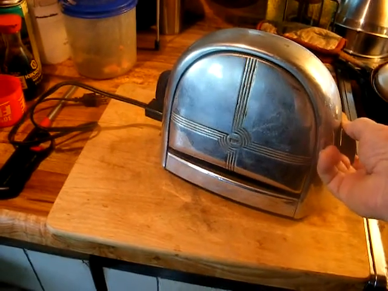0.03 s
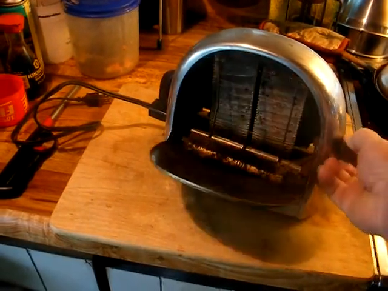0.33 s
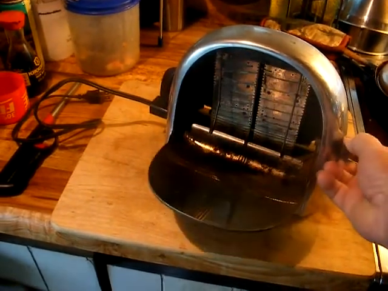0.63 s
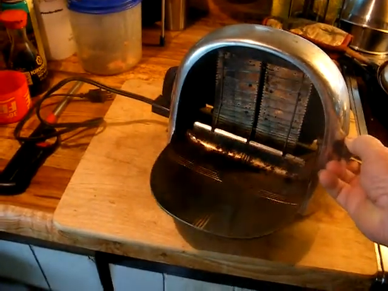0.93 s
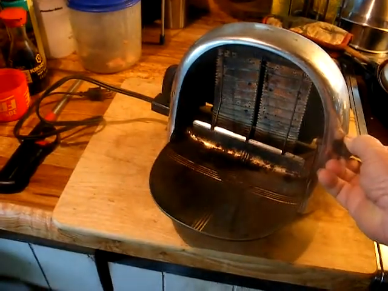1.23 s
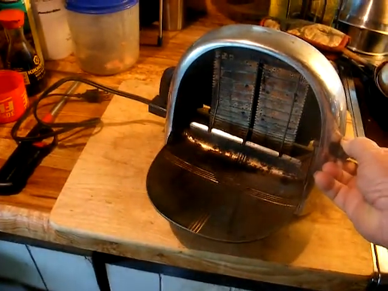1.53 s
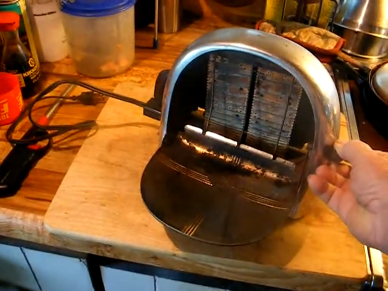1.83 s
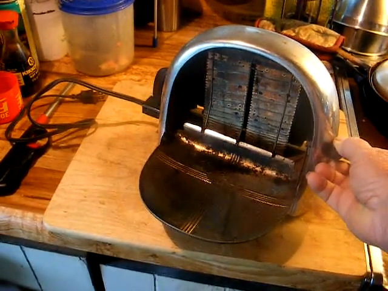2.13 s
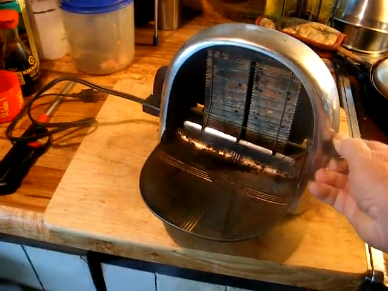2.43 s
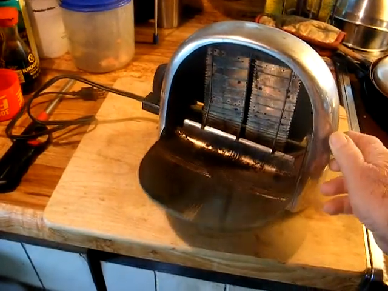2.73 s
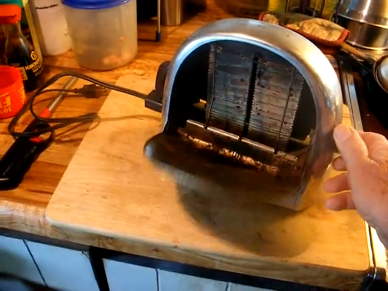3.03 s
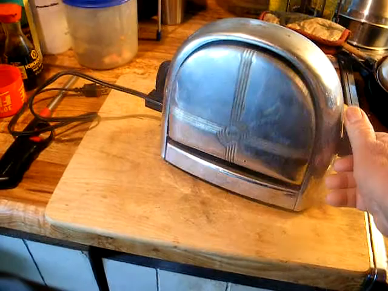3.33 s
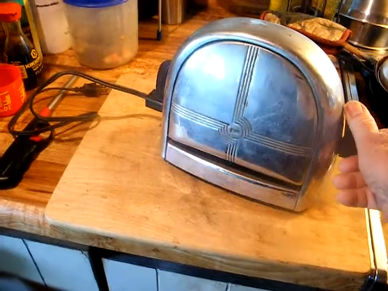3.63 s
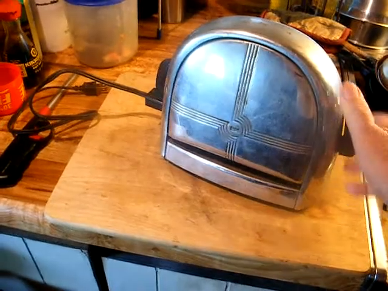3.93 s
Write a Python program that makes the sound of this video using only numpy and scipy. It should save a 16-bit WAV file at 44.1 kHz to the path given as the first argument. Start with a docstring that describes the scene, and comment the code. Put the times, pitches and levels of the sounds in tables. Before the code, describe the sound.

An old toaster's metal door drops open with a clank and bounces, then swings shut with a rattling clunk as the base knocks on a wooden board. A fan and low hum drone in a small kitchen, through a dull microphone.

```python
"""A fan and mains hum drone in a small kitchen. Over them the sheet-metal door of an old toaster is lowered
by its side knob, bounces open, and is later swung shut with a clunk and one dry electrical tick.
Each contact thumps the case, clanks the door panel and rings the linkage and its spring, while the base
rocks on its wooden board with hollow knocks. The microphone is dull and close to overload."""
import sys
import numpy as np
from scipy import signal
from scipy.fft import irfft
from scipy.io import wavfile
from scipy.ndimage import uniform_filter1d

SR = 44100
rng = np.random.default_rng(int(sys.argv[2]) if len(sys.argv) > 2 else 0)


def dump_mix(stems):
    """Bounce the given channels to the path in sys.argv[1] as a 16-bit WAV at rate SR."""
    frames = np.atleast_2d(stems).T  # one column per channel
    limited = np.clip(frames, -1, 1)  # hard clip at full scale
    pcm = np.round(limited * 32767).astype(np.int16)
    wavfile.write(sys.argv[1], SR, pcm)


N = 176400

# colour of the fan's air noise (frequency [Hz], relative level [dB])
FAN_SPECTRUM = [(30, -87.5), (85, -71), (135, -58), (185, -61), (215, -51), (250, -55), (290, -47),
                (350, -45), (430, -50), (480, -53), (640, -58), (780, -60), (920, -57.5), (1120, -63.5),
                (1400, -69.5), (1850, -69.5), (2150, -65.5), (2600, -69.5), (3100, -74), (3650, -78),
                (3850, -87), (4200, -88.5), (4400, -91.5), (4900, -99)]
# duct resonances on top of the air (centre [Hz], width [Hz], lift [dB])
DUCT_PEAKS = [(332, 35.2, 6.76), (412, 27, 3.3), (694, 18, 3.8), (834, 41, 7.7), (1081, 30, 4),
              (1716, 70, 3.4)]
# mains and motor hum (frequency [Hz], rms level [dB], waver [share of amplitude])
HUM_PARTIALS = [(57, -46, 0.092), (115.9, -39, .3), (173.3, -48.5, .4)]

# the base rocking on the board (time [s], pitch [Hz], level [dB], attack [s], t60 [s])
BASE_KNOCKS = [(0.3385, 690.3, -12, 0.0034, .085), (3.5420, 659, -2.5, 0.0054, .105),
               (3.6255, 533, -11, 0.003, 0.092), (3.8500, 548, -17.5, 0.0059, .09),
               (3.8800, 548, -17.5, 0.0082, 0.053), (3.9740, 550, -17.5, 0.0041, .17)]
# woody grain around each knock (frequency [multiple of the pitch], relative level [dB])
GRAIN_SPECTRUM = [(.3, -32), (.65, -7.5), (1, 1.5), (1.45, -9.5), (2.5, -37)]

# ringing modes of each part, dull to bright (frequency [Hz], relative level [dB], unscaled t60 [s])
CASE_MODES = [(364.7, -4.5, 0.093), (429, -13.5, .09), (539.4, -8.5, 0.044)]
PANEL_MODES = [(670, -1.5, 0.13), (786.6, -3, .09), (842, -9, 0.094), (1034, -8, 0.11), (1113, -5, 0.13),
               (1420, -11.5, .08), (1557, -16, .09), (1760, -15.5, 0.074)]
LINKAGE_MODES = [(2095, 0.5, 0.075), (2280, -8.5, 0.11), (2781, -1.5, .11), (2840, -6, 0.11),
                 (2945, -2, 0.057), (3030, -1.5, 0.062), (3370, -6.5, 0.11), (3554, -5.5, .08),
                 (3570, -10, .08), (4340, -19.5, 0.14)]
SPRING_MODES = [(2280, -8.5, .07), (2395, 1.5, 0.063), (2388, -4, 0.1)]
# colour of the dense clatter around those modes (frequency [Hz], relative level [dB])
CASE_SPECTRUM = [(100, -20), (250, -11.5), (370, 0.5), (550, -5.5), (800, -30), (1500, -45)]
PANEL_SPECTRUM = [(250, -22.5), (500, -13.5), (700, 1), (1100, -4), (1400, -11), (1900, -11), (2800, -32),
                  (5000, -60)]
LINKAGE_SPECTRUM = [(900, -19.5), (1700, -1), (2200, 1), (3000, 0), (3600, -1.5), (3900, -10.5),
                    (4500, -15.5), (5200, -30.5)]
SPRING_SPECTRUM = [(1700, -25), (2100, -13.5), (2370, 3), (2520, -8), (3200, -32)]
# door hits, opening and then shutting
# (time [s], case [dB], panel [dB], linkage [dB], spring [dB], attack [s], decay scale [factor])
DOOR_HITS = [(0.3258, -22, -14.5, -16, -33.5, .001, 1.2), (0.3395, -11, -18.5, -25.5, -29.5, .002, .8),
             (0.3850, -43, -28.5, -27, -25, .004, 1.1), (0.4105, -40, -33, -24, -20, .003, 0.84),
             (0.4210, -29, -23.5, -19.5, -12.5, 0.0018, 0.8),
             (0.4360, -29.5, -20.5, -17.5, -32.5, .003, 0.58), (0.4500, -19.5, -21, -30, -32, .002, 2),
             (0.6323, -17, -16, -22, -26.5, .002, 1.1), (0.7000, -24.5, -18, -22, -33.5, 0.0021, 0.94),
             (3.3394, -34, -16.5, -13.5, -8.5, 0.0032, .85), (3.3570, -25, -36.5, -28, -28, 0.003, 0.58),
             (3.4310, -40, -27.5, -34, -37, .004, 1.5), (3.4880, -32, -33, -35, -31.5, .005, 2.1),
             (3.5340, -35, -19.5, -27.5, -25, 0.0029, 1.0), (3.5480, -14.5, -12, -20.5, -28.5, 0.0011, 1.4),
             (3.5635, -19.5, -18, -20.5, -21, 0.0016, 0.97), (3.6010, -15, -17.5, -18, -24, .001, 1.12),
             (3.6120, -33, -27, -23, -25.5, .002, 1.2), (3.6280, -18, -23.5, -29, -30, 0.004, 1.3),
             (3.7722, -45, -42, -20.5, -30.5, 0.0052, 0.88), (3.8800, -31, -29, -34, -38, 0.0063, 1.8)]


def amp(db):
    """Decibels to gain."""
    return 10 ** (np.asarray(db) / 20)


def unit(x):
    """Scale to rms 1."""
    return x / np.sqrt(np.mean(x ** 2))


def noise(spectrum, size, peaks=()):
    """Coloured noise of rms 1, with resonant peaks on top."""
    freqs = np.arange(size // 2 + 1) * SR / size + 1e-3
    hz, db = np.array(spectrum).T
    shape_db = np.interp(np.log(freqs), np.log(hz), db)
    for centre, width, lift in peaks:
        shape_db += lift / (1 + (2 * (freqs - centre) / width) ** 2)
    phases = np.exp(2j * np.pi * rng.random(len(freqs)))
    return unit(irfft(amp(shape_db) * phases, size))


def wander(rate_hz):
    """Smooth random modulation of rms 1."""
    step = int(SR / rate_hz)
    stairs = np.repeat(rng.standard_normal(N // step + 1), step)
    return unit(uniform_filter1d(uniform_filter1d(stairs, step), step)[:N])


def fade(t, t60):
    """Exponential decay, 60 dB down after t60 seconds."""
    return np.exp(-np.log(1000) * t / t60)


def strike(t, attack, t60, hold=0):
    """Percussive envelope: linear attack, hold, free decay."""
    return np.minimum(t / attack, 1) * fade(np.maximum(t - attack - hold, 0), t60)


def add(out, start, x):
    """Mix a sound in at a time in seconds."""
    i = int(start * SR)
    out[i:i + len(x)] += x[:max(N - i, 0)]


def fan(level_db=-20.5, flutter_db=0.4):
    """A bed of air droning in duct resonances, with a slight flutter in level."""
    air = noise(FAN_SPECTRUM, N, peaks=DUCT_PEAKS)
    return air * amp(level_db + flutter_db * wander(rate_hz=14))


def hum():
    """Low mains and motor tones, each wavering in level and phase."""
    out, t = np.zeros(N), np.arange(N) / SR
    for hz, db, depth in HUM_PARTIALS:
        waver = 1 + depth * (wander(rate_hz=12) + 1j * wander(rate_hz=12))
        out += amp(db) * np.sqrt(2) * np.real(waver * np.exp(2j * np.pi * hz * t))
    return out


def kitchen(direct, wet_db=-9, t60=0.28, predelay_s=0.008):
    """The direct sound plus the short, diffuse tail of a small room."""
    t = np.arange(SR // 2) / SR
    tail = rng.standard_normal(len(t)) * fade(t, t60) * (t > predelay_s)
    tail /= np.sqrt(np.sum(tail ** 2))
    return direct + amp(wet_db) * signal.fftconvolve(direct, tail)[:N]


def base_knocks(grain_db=-7):
    """The toaster rocks on its board: soft, hollow knocks, each a clean tone in woody grain."""
    out, t = np.zeros(N), np.arange(SR // 2) / SR
    for start, hz, db, attack, t60 in BASE_KNOCKS:
        grain = noise([(multiple * hz, level) for multiple, level in GRAIN_SPECTRUM], len(t))
        knock = np.sin(2 * np.pi * hz * t) + amp(grain_db) * grain
        add(out, start, amp(db) * knock * strike(t, attack, t60))
    return out


def struck_metal(t, modes, spectrum, attack, decay_scale, ring_db=-2, clatter_db=-3):
    """One struck part: slightly detuned modes ring over a burst of clatter from the chattering contact."""
    ring = np.zeros(len(t))
    for hz, db, t60 in modes:
        detuned_hz = hz * (1 + 0.0069 * rng.standard_normal())
        tone = np.sin(2 * np.pi * (detuned_hz * t + rng.random()))
        ring += amp(db) * tone * strike(t, attack, t60 * decay_scale)
    ring /= np.sqrt(sum(amp(db) ** 2 for _, db, _ in modes) / 2)  # about rms 1 before the decay
    clatter = noise(spectrum, len(t)) * strike(t, attack, t60=0.08 * decay_scale, hold=0.0029)
    return amp(ring_db) * ring + amp(clatter_db) * clatter


def door():
    """Every hit shakes case, panel, linkage and spring in its own blend of thump, clank and ring."""
    out, t = np.zeros(N), np.arange(SR // 2) / SR
    parts = [(CASE_MODES, CASE_SPECTRUM), (PANEL_MODES, PANEL_SPECTRUM),
             (LINKAGE_MODES, LINKAGE_SPECTRUM), (SPRING_MODES, SPRING_SPECTRUM)]
    for start, *levels, attack, decay_scale in DOOR_HITS:
        for db, (modes, spectrum) in zip(levels, parts):
            add(out, start, amp(db) * struck_metal(t, modes, spectrum, attack, decay_scale))
    return out


def scene():
    """Mono mix: a dry bed of fan and hum under the toaster in its room."""
    return (fan() + hum() + kitchen(door() + base_knocks()))[None]


def record(dry, mic_hz=4744, top_hz=16000, dc_offset=-0.018):
    """A dull microphone, an electrical tick, hard clipping at full scale and a small offset."""
    mic_lowpass = signal.cheby1(12, 0.3, mic_hz, fs=SR, output="sos")
    dull = signal.sosfilt(mic_lowpass, dry)
    add(dull[0], start=3.4232, x=amp([-11]))  # one-sample tick as the door swings shut
    clipped = np.clip(dull, -1, 1)
    top_cut = signal.ellip(8, 0.2, 70, top_hz, fs=SR, output="sos")
    return signal.sosfilt(top_cut, clipped) + dc_offset


dry = scene()
out = record(dry)
dump_mix(out)
```